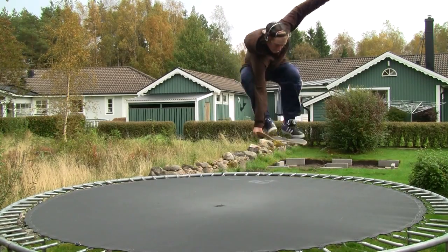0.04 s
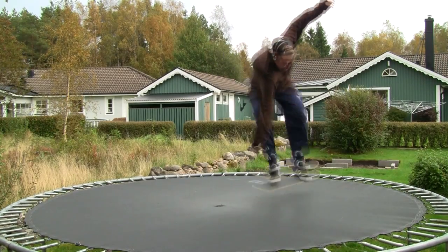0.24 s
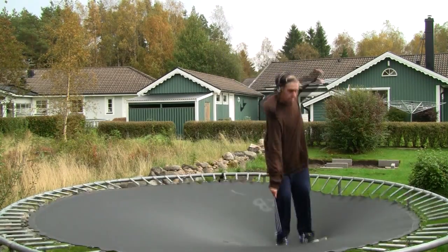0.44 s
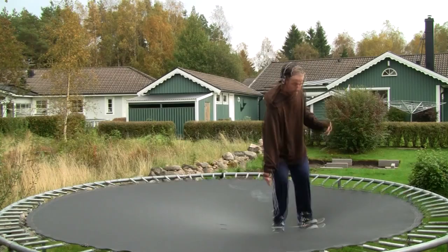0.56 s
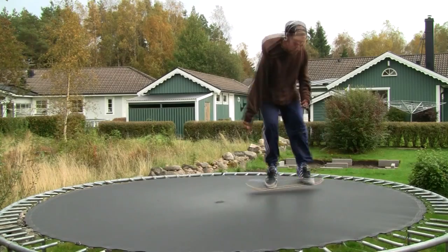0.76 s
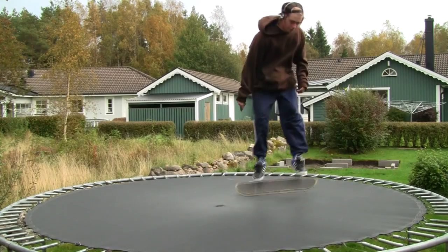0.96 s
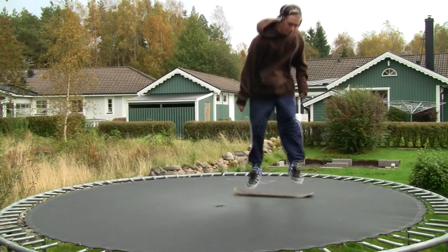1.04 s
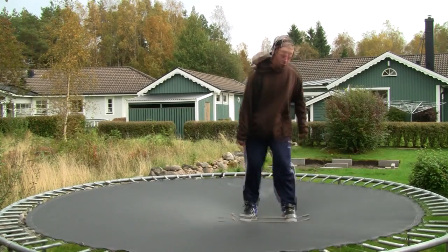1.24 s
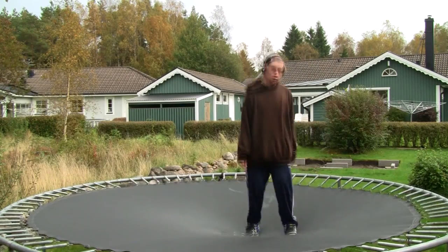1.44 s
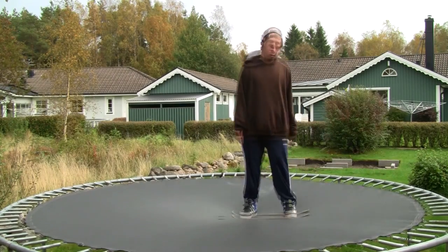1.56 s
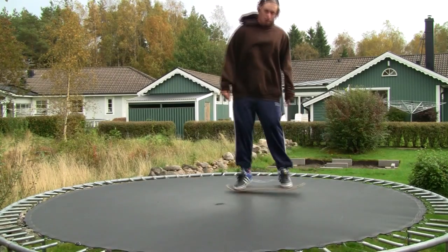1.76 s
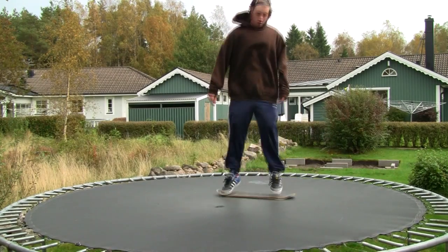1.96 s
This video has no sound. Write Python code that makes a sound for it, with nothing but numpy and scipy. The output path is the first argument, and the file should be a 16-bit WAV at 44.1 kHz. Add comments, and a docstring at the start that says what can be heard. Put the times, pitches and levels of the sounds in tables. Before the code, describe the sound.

Trampoline bounced on twice, with metal springs creaking and a board knocking underfoot.

```python
"""A quiet yard. Someone bounces twice on a trampoline, a wheelless skateboard deck underfoot.
Deck and shoes knock on each other and on the mat; the stretched mat booms and clothes flap.
As the mat stretches and lets go, the spring hooks stick and slip on the steel frame: they grind,
squeal and leave the springs ringing. The houses return a faint echo."""
import sys
import numpy as np
from scipy import signal
from scipy.fft import rfft, irfft
from scipy.io import wavfile

SR = 44100
rng = np.random.default_rng(int(sys.argv[2]) if len(sys.argv) > 2 else 0)


def unload_wav(signal):
    """Save mono or channel-first audio to the path in sys.argv[1] as 16-bit WAV at rate SR, clipped to [-1, 1]."""
    wavfile.write(
        sys.argv[1],
        SR,
        np.round(np.clip(np.atleast_2d(signal).T, -1, 1) * 32767).astype(np.int16),
    )


N = 88200
HIT_GAIN = np.sqrt(SR / 100)  # unit energy to unit rms over 10 ms

# shoe, deck and mat contacts: start_s, level_db, lowpass_hz, highpass_hz, rattle_t60_s, hollow_hz, ring_db
KNOCKS = [(0.005, -39, 560, 219, 0.14, 257.5, 13.5), (0.014, -48, 550, 258, 0.35, 554.4, 2),
          (0.2163, -29.5, 297, 88, 0.019, 136, -24), (0.2201, -32.5, 474, 169, 0.049, 269, -28),
          (0.24, -30.5, 790, 340, 0.18, 457, 0.5), (0.2427, -26, 865, 440, 0.17, 444.5, 3),
          (0.255, -35, 1910, 520, 0.18, 1294, -6), (0.3453, -44.5, 3070, 90, 0.068, 130, -27),
          (0.3595, -39.5, 4000, 130, 0.067, 500, -14), (0.368, -25.5, 3850, 129, 0.04, 478, -13),
          (0.3704, -29, 2180, 161, 0.14, 1436, -6), (0.378, -30, 2400, 111, 0.38, 629, -7.5),
          (1.108, -50.5, 1150, 126, 0.2, 385, -18), (1.1761, -37, 1410, 260, 0.15, 1156, -12),
          (1.179, -34.5, 990, 283, 0.046, 510, -31), (1.1861, -32, 1870, 340, 0.16, 605, -30)]
# deck on the mat: pitch_hz, gain_db, t60_s
DECK_MODES = [(131, 4.5, 0.055), (240, -6, 0.119), (323, 5, 0.085), (381, 2, 0.084), (448.4, 2, 0.13),
              (487.5, 4.5, 0.14), (615.4, 8.5, 0.093), (740, -30, 0.097), (867, -1.5, 0.23),
              (1184, 1, 0.13), (1226, -7, 0.068), (1480, -30, 0.1), (1680, 0, 0.14)]
# slap and rattle spectrum: freq_hz, gain_db
SLAP_EQ = [(40, -19.5), (90, -7.5), (135, -2), (200, 2.5), (260, 1), (310, -0.5), (520, -3), (850, -4),
           (1450, -1.5), (2300, -5.5), (4300, -8), (7000, -8), (15000, -13)]
SLAP_DB, DECK_DB, RATTLE_DB = -6.5, -6, 6
FLEX_DELAY_S, FLEX_DB = 0.0025, -13
HOLLOW_DB, HOLLOW_Q, HOLLOW_T60_S = 2.5, 2.2, 0.14


def knocks(size=16384):
    """The deck slaps, flexes, slaps again and rattles over a ringing hollow; soft contacts are duller."""
    out, t = np.zeros(N), np.arange(size) / SR
    flex = amp(FLEX_DB) * signal.unit_impulse(size, int(FLEX_DELAY_S * SR))
    slap = unit(colour(signal.unit_impulse(size) + flex, SLAP_EQ))
    deck = unit(sum(amp(db) * np.cos(2 * np.pi * hz * t) * fade(t60, size) for hz, db, t60 in DECK_MODES))
    for at, db, lowpass_hz, highpass_hz, t60, hollow_hz, ring_db in KNOCKS:
        rattle = unit(colour(noise_burst(t60, size), SLAP_EQ))
        blow = amp(SLAP_DB) * slap + amp(DECK_DB) * deck + amp(RATTLE_DB) * rattle
        blow += amp(HOLLOW_DB) * resonate(blow, hollow_hz, HOLLOW_Q)
        blow = unit(edge(edge(blow, lowpass_hz, "low"), highpass_hz, "high"))
        ring = amp(ring_db) * unit(np.sin(2 * np.pi * hollow_hz * t) * fade(HOLLOW_T60_S, size))
        add(out, at, amp(db) * HIT_GAIN * unit(blow + ring))
    return out


# deck edge on soles: start_s, level_db, centre_hz, t60_s
SNAPS = [(0.2528, -52, 3900, .016), (0.346, -61, 8900, 0.012), (0.362, -55, 10900, 0.021),
         (0.3686, -36.5, 4500, 0.0052), (0.371, -47, 4100, 0.013), (0.3824, -39.5, 3630, 0.075),
         (0.398, -47.5, 2750, 0.027)]


def snaps(size=4096):
    """A hard contact breaks into a brief, bright crackle."""
    out = np.zeros(N)
    for at, db, hz, t60 in SNAPS:
        grains = clicks(size, per_s=5700, scatter_db=2.5) * fade(t60, size)
        add(out, at, amp(db) * HIT_GAIN * unit(band(grains, hz, q=2.1)))
    return out


# hooks grinding, the first two rows the deck's treble rattle after its knock: peak_s, rise_s, hold_s, level_db,
# tilt_db_per_octave
CREAKS = [(0.245, 0.0016, 0.0013, -55, 1.5), (0.28, .03, 0.046, -67, -4), (0.391, 0.029, 0.06, -41, -3),
          (0.503, 0.052, 0.00077, -24.5, -1), (0.518, 0.016, 0.005, -26, 0),
          (0.532, 0.0076, 0.005, -48.5, -4.5), (0.674, 0.00032, 0.0011, -31, 1.5),
          (0.685, 0.0021, 0.013, -37, -1.6), (0.72, 0.0036, 0.025, -45.5, -2),
          (0.799, 0.0038, 0.021, -45.5, -2.5), (0.897, 0.0035, 0.01, -45.5, -1),
          (1.04, 0.0027, 0.0028, -67.5, 2), (1.105, 0.0017, 0.0046, -65, 5),
          (1.167, 0.023, 0.017, -62, 2.5), (1.206, 0.026, 0.039, -58, -4), (1.377, 0.043, 0.014, -61, 1),
          (1.422, 0.011, 0.011, -39, -2), (1.588, .003, 0.011, -70, 10), (1.675, 0.066, .015, -55, 4),
          (1.684, 0.0085, 0.029, -40, -0.5), (1.764, 0.00092, 0.014, -42, -0.4),
          (1.947, 0.0081, 0.012, -69.5, 9.5)]
# grinding steel spectrum: freq_hz, gain_db
STEEL_EQ = [(100, -29), (300, -11.5), (450, -9), (620, -4.5), (780, -1.5), (1000, 1), (1200, -3.5),
            (1600, 5.5), (2000, 3), (3100, 0), (4500, 1.5), (5900, 4), (6800, -1.5), (8100, 2), (9500, -5),
            (11200, -1.5), (13500, -7), (15500, -6)]
# long ring of all springs: freq_hz, gain_db
SHIMMER_EQ = [(150, -8), (330, 1), (460, -12), (700, 0.5), (1300, 10), (2200, 6.5), (3200, 5),
              (4500, -16.5), (6000, 3), (9000, -24), (15000, -54)]
# steel frame: pitch_hz, gain_db, t60_s
FRAME_MODES = [(454.5, -20, 0.057), (966, -26, 0.32), (1472, -13.5, 0.18), (2462, -19, 0.31),
               (2583, -14.5, 0.27), (3310, -24.5, 0.34), (3540, -26, 0.2), (4150, -30, 0.26),
               (5700, -20, 0.21), (5630, -21.5, 0.13), (5950, -28, 1), (7510, -20, 0.083)]
# springs ringing through each jump: pitch_hz, gain_db, t60_s
SPRING_MODES = [(465, -37, 12), (1378, -31.5, 4.9), (2097, -26.5, 1.8), (2168, -29, 2.2), (2210, -39, 1.5),
                (2904, -25, 1.5), (3090, -29, 1.1)]
BITE_DB, COIL_DB, SHIMMER_DB = 1, -8.5, -21.5
STEEL_WAVER_RAD = 0.73


def springs():
    """Hooks stick and slip on the frame: dense clicks clatter in the coils and set the steel ringing."""
    slips, power = 0, 0
    for at, rise, hold, db, tilt in CREAKS:
        push = amp(db) * force(at, rise, hold, fall_s=0.02)
        grind = unit(clicks(N, per_s=6000, scatter_db=3) * push)
        tilted = colour(grind, [(250, -4 * tilt), (16000, 2 * tilt)])  # pivot at 4 kHz
        slips += tilted * np.sqrt(np.sum(push ** 2))
        power += push ** 2
    clatter = unit(noise_burst(t60_s=0.21))
    bite = amp(BITE_DB) * unit(noise_burst(t60_s=0.0065))
    ring = amp(COIL_DB) * many_modes(800, t60_s=0.37)
    coils = unit(colour(bite + clatter + ring, STEEL_EQ))
    shimmer = amp(SHIMMER_DB) * unit(colour(many_modes(1000, t60_s=2.7), SHIMMER_EQ))
    tones = sing(np.sqrt(power), FRAME_MODES + SPRING_MODES, STEEL_WAVER_RAD)
    return convolve(slips, coils + shimmer) + tones


# hook release: peak_s, rise_s, hold_s, level_db
SQUEALS = [(0.6742, 0.0003, 0.005, -29), (0.684, 0.003, .015, -37)]
# squeal partials: pitch_hz, gain_db, t60_s
SQUEAL_MODES = [(550, -19.5, .15), (1077, -11, 0.22), (1535, -.5, .05), (1590, -15, 0.034),
                (2062, -7, 0.12), (3155, -19, .4), (3618, -13.5, 0.12), (4118, -14, .1), (4522, -18, 0.2),
                (5146, -15, .08), (5930, -13, 0.21)]


def squeals():
    """A hook snaps free and squeals as the load comes off."""
    return sing(swells(SQUEALS, fall_s=0.0052), SQUEAL_MODES, waver_rad=0.34)


# hook squeaks: peak_s, rise_s, hold_s, level_db
SQUEAKS = [(0.755, 0.0038, 0.0062, -55), (1.278, 0.0038, 0.014, -61), (1.354, 0.0073, 0.01, -69)]


def squeaks(centre_hz=10870, width_hz=1100):
    """Hooks squeak in a thin, high band."""
    thin = band(rng.standard_normal(N), centre_hz, q=centre_hz / width_hz)
    return swells(SQUEAKS, fall_s=0.064) * unit_rms(thin)


# spring flick: peak_s, level_db
TWANGS = [(0.526, -34.5)]
# twang partials: pitch_hz, gain_db, t60_s
TWANG_MODES = [(2942, -11, .7), (2972, -11, 0.6), (3345, -1.5, 0.62), (3378, -5, 0.32)]


def twang():
    """One spring, flicked at the deepest stretch, rings on close partials."""
    push = sum(amp(db) * force(at, rise_s=0.0033, hold_s=0.0042, fall_s=0.0058) for at, db in TWANGS)
    return sing(push, TWANG_MODES, STEEL_WAVER_RAD)


# mat under load: peak_s, rise_s, hold_s, level_db
BOOMS = [(0.351, 0.0033, 0.014, -43), (0.41, 0.049, 0.16, -64.5), (1.193, 0.033, 0.019, -56.5)]


def mat():
    """The stretched mat booms like a slack drum."""
    boom = band(rng.standard_normal(N), hz=137.4, q=2.5)
    return swells(BOOMS, fall_s=0.095) * unit_rms(boom)


# cloth flaps: peak_s, rise_s, hold_s, level_db
FLAPS = [(0.002, 0.041, 0.0036, -42.5), (0.077, 0.067, 0.012, -53), (0.106, 0.061, 0.11, -59),
         (1.09, 0.014, 0.026, -66.5), (1.217, 0.019, 0.039, -55)]
# cloth spectrum: freq_hz, gain_db
CLOTH_EQ = [(25, -35), (60, -5.5), (130, 0.5), (250, 4.5), (380, -7), (580, -6.5), (850, -14.5),
            (1500, -28.5), (4000, -38.5), (15000, -60)]


def cloth():
    """Loose clothes flutter as the legs tuck and stretch."""
    flutter = colour(rng.standard_normal(N), CLOTH_EQ)
    return swells(FLAPS, fall_s=0.039) * unit_rms(flutter)


# mat and spring drone spectrum: freq_hz, gain_db
DRONE_EQ = [(25, -34), (55, -20.5), (100, -9), (200, -5.5), (330, 0), (460, 1.5), (650, -3), (1000, -7),
            (2200, -13.5), (4000, -21), (10000, -26), (15000, -46)]
# yard spectrum: freq_hz, gain_db
YARD_EQ = [(22, -52), (55, -8), (100, 8.5), (170, 3), (400, -1), (700, -12.5), (1200, -3.5), (2500, -14),
           (6000, -25.5), (15000, -49)]
DRONE_START_S, DRONE_DB, YARD_DB = 0.37, -58.5, -68.5


def background():
    """Distant outdoor noise, joined by the steady drone of the shaken trampoline."""
    out = amp(YARD_DB) * unit_rms(colour(rng.standard_normal(N), YARD_EQ))
    drone = amp(DRONE_DB) * unit_rms(colour(many_modes(3000, t60_s=np.inf), DRONE_EQ))
    add(out, DRONE_START_S, drone)
    return out


def garden(echo_db=-20):
    """Trampoline, faint echo from the houses, background."""
    near = knocks() + snaps() + springs() + squeals() + squeaks() + twang() + mat() + cloth()
    echo = unit(edge(noise_burst(t60_s=0.34), 4200, "low"))
    return near + amp(echo_db) * convolve(near, echo) + background()


def sing(push, modes, waver_rad, waver_per_s=130):
    """Each mode stores the energy of the push and lets it out; its phase wavers while driven."""
    t, out = np.arange(N) / SR, 0
    for hz, db, t60 in modes:
        retained = np.exp(-2 * np.log(1000) / (t60 * SR))
        energy = signal.lfilter([1 - retained], [1, -retained], push ** 2 + 1e-20)
        waver = np.interp(t * waver_per_s, np.arange(1024), rng.standard_normal(1024))
        driven = np.minimum(push / np.sqrt(energy), 1)
        phase = 2 * np.pi * hz * t + waver_rad * waver * driven
        out += amp(db) * np.sqrt(2 * energy) * np.sin(phase)
    return out


def many_modes(count, t60_s):
    """Modes at random pitches with one shared decay."""
    chosen = rng.permutation(N // 2 + 1) < count
    phase = 2 * np.pi * rng.random(N // 2 + 1)
    return unit(irfft(chosen * np.exp(1j * phase), N) * fade(t60_s))


def clicks(size, per_s, scatter_db):
    """Impulses of random time, sign and level."""
    hits = rng.random(size) < per_s / SR
    return hits * rng.choice([-1, 1], size) * amp(scatter_db * rng.standard_normal(size))


def noise_burst(t60_s, size=N):
    """Decaying white noise."""
    return rng.standard_normal(size) * fade(t60_s, size)


def force(peak_s, rise_s, hold_s, fall_s):
    """Swell, hold, release; rise_s and fall_s each span 20 dB."""
    t = np.arange(N) / SR - peak_s
    return 10 ** (np.minimum(t, 0) / rise_s - np.maximum(t - hold_s, 0) / fall_s)


def swells(events, fall_s):
    """Summed force envelopes."""
    return sum(amp(db) * force(at, rise, hold, fall_s) for at, rise, hold, db in events)


def fade(t60_s, size=N):
    """Exponential decay."""
    return np.exp(-np.log(1000) * np.arange(size) / SR / t60_s)


def colour(x, points, size=2048):
    """Minimum-phase filter through (freq_hz, gain_db) points."""
    hz, db = np.array(points, float).T
    bins_hz = np.arange(size // 2 + 1) * SR / size
    gain = amp(np.interp(np.log(bins_hz + 1), np.log(hz), db))
    cepstrum = irfft(np.log(gain))
    cepstrum[1:size // 2] *= 2
    cepstrum[size // 2 + 1:] = 0
    return convolve(x, irfft(np.exp(rfft(cepstrum))))


def edge(x, hz, kind):
    """Second-order low-pass or high-pass."""
    return signal.lfilter(*signal.butter(2, hz, kind, fs=SR), x)


def resonate(x, hz, q):
    """Resonance, unit gain at centre."""
    return signal.lfilter(*signal.iirpeak(hz, q, fs=SR), x)


def band(x, hz, q):
    """Two resonances in series."""
    return resonate(resonate(x, hz, q), hz, q)


def convolve(x, response):
    """Convolution cut to input length."""
    return signal.fftconvolve(x, response)[:len(x)]


def add(out, start_s, x):
    """Mix x in at start_s."""
    i = int(start_s * SR)
    out[i:i + len(x)] += x[:N - i]


def amp(db):
    """Decibels to gain."""
    return 10 ** (np.asarray(db) / 20)


def unit(x):
    """Scale to unit energy."""
    return x / np.sqrt(np.sum(x ** 2) + 1e-20)


def unit_rms(x):
    """Scale to unit rms."""
    return unit(x) * np.sqrt(len(x))


# side against mid: freq_hz, gain_db
WIDTH_EQ = [(100, -20), (300, -18), (500, -16), (1200, -15), (3000, -11), (7000, -7), (12000, -3),
            (16000, -3)]
# left against right: freq_hz, gain_db
BALANCE_EQ = [(100, -.8), (600, -1.2), (3000, -.6), (9000, -2), (12500, 3), (16000, 3.5)]
DIFFUSE_DB = -6  # yard and drone come from all sides


def scene():
    """Springs ring the rim, so the side signal has its own fine detail, a quarter cycle out of phase."""
    mid = garden()
    quadrature = np.imag(signal.hilbert(garden()))
    side = colour(quadrature, WIDTH_EQ) + amp(DIFFUSE_DB) * background()
    left = colour(mid + side, [(hz, db / 2) for hz, db in BALANCE_EQ])
    right = colour(mid - side, [(hz, -db / 2) for hz, db in BALANCE_EQ])
    return np.array([left, right])


def record(dry):
    """Top-octave roll-off, then a steep low-pass."""
    soft = np.array([colour(x, [(12500, 0), (14000, -1.5), (15500, -21)]) for x in dry])
    lowpass = signal.ellip(10, 0.2, 70, 15700, fs=SR, output="sos")
    return signal.sosfilt(lowpass, soft)


dry = scene()
out = record(dry)
unload_wav(out)
```